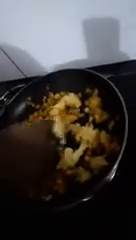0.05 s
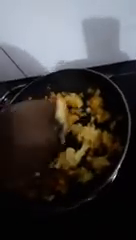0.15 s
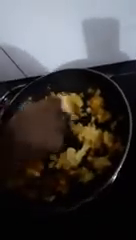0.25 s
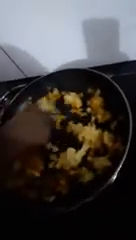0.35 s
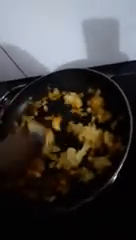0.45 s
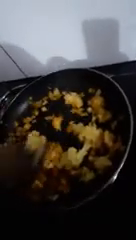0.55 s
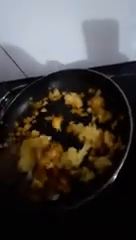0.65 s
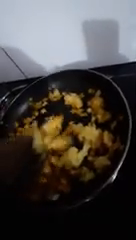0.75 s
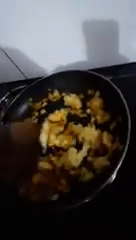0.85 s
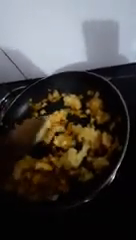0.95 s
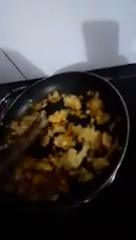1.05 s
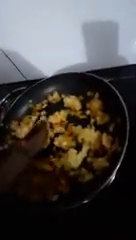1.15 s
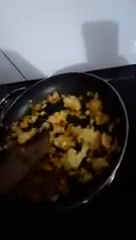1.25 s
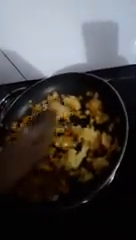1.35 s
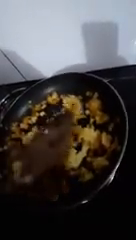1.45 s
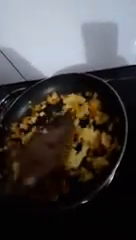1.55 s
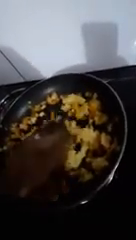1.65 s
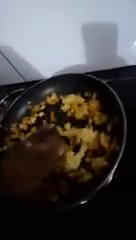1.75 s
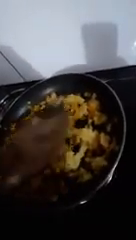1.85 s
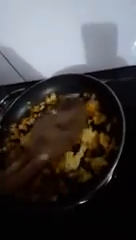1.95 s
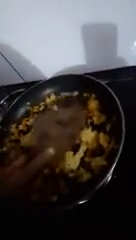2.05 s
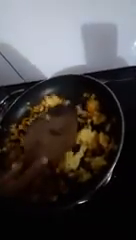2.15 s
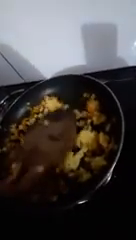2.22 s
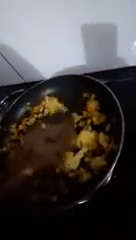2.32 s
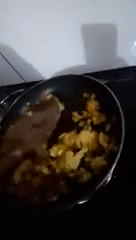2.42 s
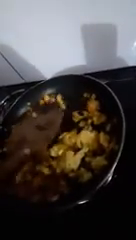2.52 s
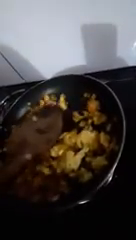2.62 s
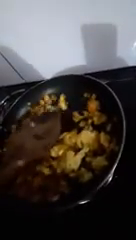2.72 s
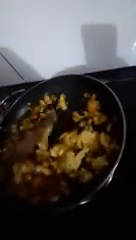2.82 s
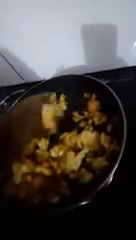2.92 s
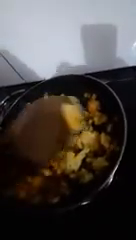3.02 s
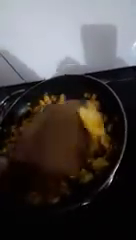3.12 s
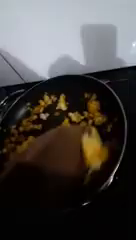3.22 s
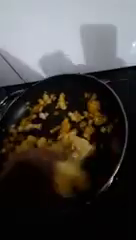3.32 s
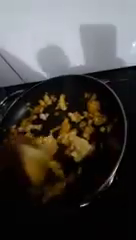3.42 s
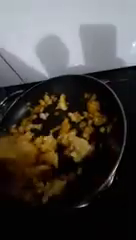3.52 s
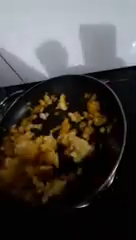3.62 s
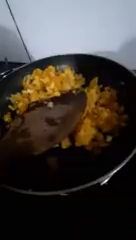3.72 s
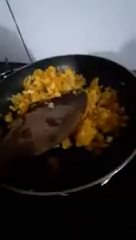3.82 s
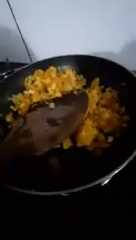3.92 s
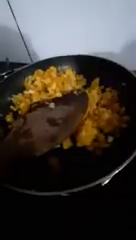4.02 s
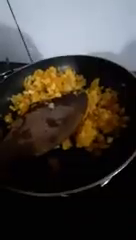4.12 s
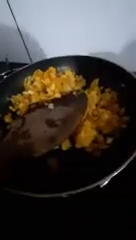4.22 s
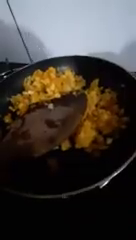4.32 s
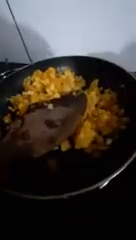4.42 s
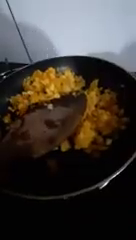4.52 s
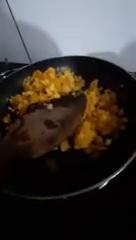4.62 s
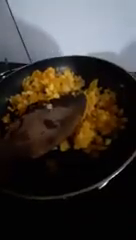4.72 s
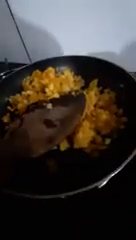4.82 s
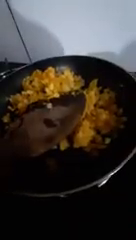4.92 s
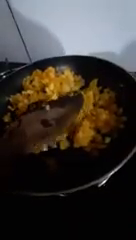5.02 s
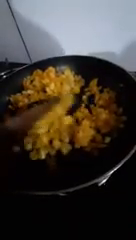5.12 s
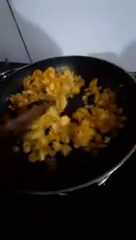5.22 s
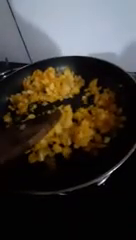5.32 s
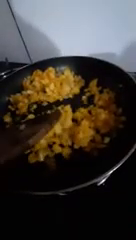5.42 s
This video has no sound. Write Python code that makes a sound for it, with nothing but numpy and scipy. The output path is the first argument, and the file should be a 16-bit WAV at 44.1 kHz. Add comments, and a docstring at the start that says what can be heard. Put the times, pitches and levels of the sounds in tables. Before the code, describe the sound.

A frying pan is heard close up in a small, slightly echoing kitchen, over very faint low room hum. At 0 s a wooden spatula chatters against the pan in a quick run of knocks with a dry, gritty scrape, ending by 0.2 s. A thin, bright, airy sizzle continues while pushes come about every third of a second, each a soft swell of moist crackle and rubbing on metal. A firm knock with a short scrape lands near 0.75 s, a lighter, brighter click at 1.9 s. Tiny fat spits tick throughout, the sharpest around 2.6 s, and the pan bumps dully on the stove. Strokes are softer from 2.1 to 2.9 s, then knocks cluster at 3.3-3.7 s, followed by a strong scraping push around 3.8 s. At 4 s the sizzle drops abruptly, then slowly creeps up under faint strokes. A last double knock, thud and scrape come at 5.2 s, before the end near 5.5 s.

```python
"""A wooden spatula stirs mashed potato and onion in a frying pan for 5.5 s, over a sizzle and a faint room hum.
0-0.2 s: a run of knocks and a dry scrape (struck pan modes; stick-slip grains rung through the pan).
0.2-4 s: pushes smear the wet food (coloured grains) and rub the metal; fat spits (noise bursts), the pan
bumps on the stove (short low pulses), and knocks fall near 0.7, 1.9 and 3.3-3.7 s, echoed by the kitchen.
4 s: a cut to a quieter sizzle, which then creeps up; weaker pushes, and last knocks and a scrape at 5.2 s."""
import sys
import numpy as np
from scipy import signal
from scipy.fft import rfft, irfft, next_fast_len
from scipy.io import wavfile
from scipy.ndimage import map_coordinates

SR = 44100
rng = np.random.default_rng(int(sys.argv[2]) if len(sys.argv) > 2 else 0)


def digitize_waveform(pressure):
    """Quantize a signal to 16-bit integers and store it at the path in sys.argv[1].

    Rows of a 2-D input are taken as channels; values are limited to [-1, 1].
    """
    field = np.atleast_2d(pressure).T
    bounded = np.clip(field, -1, 1)
    quanta = np.round(bounded * 32767).astype(np.int16)
    wavfile.write(sys.argv[1], SR, quanta)


N = 240628


def amp(db):
    """Decibels to gain."""
    return 10 ** (np.asarray(db) / 20)


def unit(x):
    """Scale to rms 1."""
    return x / np.sqrt(np.mean(x ** 2) + 1e-20)


def along(points, hz):
    """Read (f/Hz, value) points on a log-frequency axis."""
    f, v = np.transpose(points)
    return np.interp(np.log(hz + 1), np.log(f + 1), v)


def wobble(knots_per_s):
    """Smooth random curve through normally distributed knots."""
    knots = rng.standard_normal(int(N * knots_per_s / SR) + 4)
    return map_coordinates(knots, [np.arange(N) * knots_per_s / SR])


def filtered(x, response):
    """Multiply the spectrum of x by a response of frequency."""
    m = next_fast_len(x.shape[-1] + 8192)
    hz = np.fft.rfftfreq(m, 1 / SR)
    return irfft(rfft(x, m) * response(hz), m)[..., :x.shape[-1]]


def coloured(x, spectrum):
    """Minimum-phase filter with the gain of (f/Hz, level/dB) points."""
    def response(hz):
        cepstrum = irfft(np.log(amp(along(spectrum, hz))))
        half = len(cepstrum) // 2
        # fold onto positive time: causal
        return np.exp(rfft(np.r_[cepstrum[0], 2 * cepstrum[1:half], np.zeros(half)]))
    return filtered(x, response)


# left-right correlation: (f/Hz, likeness 0-1)
STEREO_LIKENESS = [(130, 0.95), (300, 0.43), (700, 0.36), (1400, 0), (3000, 0), (15000, 0.26)]


def spread(pair):
    """Mix two unrelated signals to left and right with the tabled correlation, highest in the bass."""
    def mid_side(hz):
        angle = np.arccos(np.clip(along(STEREO_LIKENESS, hz), -1, 1)) / 2
        return np.array([np.cos(angle), np.sin(angle)])
    mid, side = filtered(pair, mid_side)
    return np.array([mid + side, mid - side])


def lean(left_over_right_db):
    """Left and right gains for a level difference."""
    return unit(amp([[left_over_right_db / 2], [-left_over_right_db / 2]]))


def add(track, start_s, sound):
    """Mix a sound into a track."""
    start = max(round(start_s * SR), 0)
    part = sound[..., :N - start]
    track[..., start:start + part.shape[-1]] += part


def grains(rate_hz, scatter_db, life_s):
    """Decaying noise bursts at random moments, a few much larger than the rest; stereo, rms 1."""
    count = int(rate_hz * N / SR)
    sizes = amp(scatter_db * np.minimum(rng.exponential(size=count), 5))
    power = np.bincount(rng.integers(0, N, count), sizes ** 2, N)
    power = signal.lfilter([1], [1, -np.exp(-2 / (life_s * SR))], power)
    return unit(np.sqrt(power) * rng.standard_normal((2, N)))


# resting sizzle level, with a cut at 4 s: (t/s, level/dB)
SIZZLE_LEVEL = [(0, -42.5), (3.98, -43.5), (4.0, -52.5), (5.46, -48)]
# blade pushing food: (full pressure t/s, swell/s, release/s, crackle level/dB, rub level/dB, sizzle flare level/dB)
PUSHES = [(.01, .02, 0.095, -48.5, -43, -57), (.43, 0.066, .1, -45, -52.5, -60),
          (.74, 0.051, 0.095, -37, -48, -43), (1.07, 0.075, 0.1, -42.5, -52.5, -46),
          (1.26, 0.074, 0.073, -42, -44.5, -39.5), (1.581, 0.089, 0.13, -36.5, -47, -39.5),
          (1.78, 0.089, 0.074, -41.5, -44.5, -52), (2.15, 0.16, 0.23, -44, -55.5, -66),
          (2.47, 0.091, 0.2, -46, -58.5, -50), (2.78, 0.041, 0.097, -47, -56.5, -45),
          (3.225, 0.0097, 0.043, -38, -66, -50), (3.3, 0.07, 0.12, -36, -68, -40),
          (3.76, 0.16, 0.08, -35.5, -48, -37), (4.48, 0.033, 0.029, -54.5, -57, -59),
          (4.66, 0.1, 0.067, -59, -64, -50), (5.015, 0.032, 0.035, -46.5, -56, -43.5),
          (5.19, 0.12, 0.034, -44, -62.5, -45)]


def stirring():
    """Crackle, rub and sizzle levels in dB: each push adds a power swell to the resting levels."""
    t = np.arange(N) / SR
    level_s, level_points_db = np.transpose(SIZZLE_LEVEL)
    resting_db = np.interp(t, level_s, level_points_db)
    resting_crackle_db, resting_rub_db = -3.5, -17  # re sizzle
    power = amp([resting_db + resting_crackle_db, resting_db + resting_rub_db, resting_db]) ** 2
    for peak_s, swell_s, release_s, *levels_db in PUSHES:
        pressure = np.exp(-((t - peak_s) / np.where(t < peak_s, swell_s, release_s)) ** 2)
        power = power + np.outer(amp(levels_db), pressure) ** 2
    return 10 * np.log10(power)


# hard dry scrapes on bare metal: (peak t/s, attack/s, relative level/dB)
SCRAPES = [(.003, 0.0091, -28.5), (.765, 0.018, -36), (3.347, 0.013, -39), (3.465, 0.028, -42),
           (3.78, 0.04, -36), (5.211, 0.017, -35)]


def scraping():
    """Gain of the hard scrapes: the edge bites, lifts off quickly and slides on lightly."""
    release_s, slide_db, slide_release_s = 0.014, -11.5, 0.13
    gain = np.zeros(N)
    for peak_s, attack_s, db in SCRAPES:
        t = np.arange(N) / SR - peak_s
        bite = np.exp(-(np.minimum(t, 0) / attack_s) ** 2)
        after = np.maximum(t, 0)
        lift_off = np.exp(-after / release_s)
        slide = amp(slide_db) * np.exp(-after / slide_release_s)
        gain += amp(db) * bite * (lift_off + slide)
    return gain


# pan with blade against it: (f/Hz, mean relative level/dB, undamped t60/s); short modes: wood and loaded base
PAN_MODES = [(291.3, -14.5, 0.085), (650.5, -8, 0.17), (710, 14.5, 0.011), (866, -34, 0.38),
             (921.5, -23.5, 0.54), (1144, -16.5, 0.11), (1221, -12, 0.11), (1386, 8.5, 0.0098),
             (1525, -6, 0.067), (1575, -32.5, 0.15), (1744, -21, 0.2), (2046, -7.5, 0.05),
             (2070, -4, 0.011), (2430, -25, 0.15), (3025, -28, 0.16), (3406, -14, 0.034),
             (4560, 0.5, 0.0051), (5750, -29, 0.44), (6370, -10, 0.025)]


def pan_ring(damping_db_per_s):
    """Pan's answer to one push: decaying modes, each with its own strength and phase per side."""
    t = np.arange(SR // 2) / SR
    ring = np.zeros((2, len(t)))
    for k, (hz, db, t60_s) in enumerate(PAN_MODES):
        size_db, phase = rng.standard_normal((2, 2, 1))
        lag = .6 * phase * np.sqrt(hz / PAN_MODES[2][0])
        decay = amp(db + size_db - 60 * t / t60_s - damping_db_per_s * t)
        ring += (-1) ** k * decay * np.sin(2 * np.pi * hz * t + lag)
    return ring * (1 - np.exp(-t / 0.00045))


# dry rasp spectrum: (f/Hz, relative level/dB)
RASP_SPECTRUM = [(100, -30), (300, -0.5), (720, -6), (1050, -1), (1480, -3.5), (2100, 2), (2900, -7),
                 (5000, -17.5), (9000, -32)]
# resonances of the blade gliding on the greased pan: (f/Hz, width/Hz, relative level/dB)
GLIDE_MODES = [(749, 137, -5), (1297, 38, 1), (1498, 81, 2), (2343, 47, -5), (3036, 210, -2.5)]


def rubbing(rub_db):
    """Stick-slip grains drive glide resonances, the damped pan and a rasp that grows faster than the level."""
    glide_tone_db, glide_grit_db = -6.5, -2  # re rub level
    level_db = 20 * np.log10(np.hypot(amp(rub_db + glide_grit_db), scraping()))
    slips = spread(grains(rate_hz=2500, scatter_db=2.3, life_s=.0006))
    held_pan = pan_ring(damping_db_per_s=300)  # blade pressed on the pan
    ring = signal.fftconvolve(slips, held_pan, axes=1)[:, :N]
    ring = unit(coloured(ring, [(250, -7.5), (750, -14.5), (1100, -3), (1500, -4.5), (2000, -1), (3000, 6.0)]))
    rasp = unit(coloured(slips, RASP_SPECTRUM)) * amp(0.12 * (level_db + 38.0))

    def resonances(f):
        total = 0
        for k, (hz, width_hz, db) in enumerate(GLIDE_MODES):
            damping = 1j * f * width_hz
            total = total + (-1) ** k * amp(db) * damping / (hz * hz - f * f + damping)
        return total

    glide = unit(filtered(slips, resonances)) * amp(rub_db + glide_tone_db)
    grit = (0.79 * ring + 0.76 * rasp) * amp(level_db)
    unsteady_db = 1.5 * wobble(30)
    return (grit + glide) * amp(unsteady_db) * lean(-6.0)


# blade on pan: (t/s, relative level/dB, weight = bass setting/dB, hardness = treble setting/dB)
KNOCKS = [(.001, -21.5, 11, 0), (.0102, -17.5, -4, 1), (.0265, -18.5, 3, -4), (.04, -19.5, -12, -14),
          (.057, -22, 2, -18), (.165, -27.5, -9, -12), (.7385, -8, 1.5, -1.5), (.7995, -33, 5, 2),
          (1.8972, -19, -2, 19.5), (3.343, -23.5, 2.5, -34), (3.4324, -6.5, -6, 8), (3.4342, -14, 8.5, -5),
          (3.66, -10, 4.5, 11.5), (3.722, -21.5, 1, -25), (5.2072, -19, 15, 19), (5.2123, -14.5, 10, -3)]


def knocks():
    """Contact push and chatter plus pan ring: weight lifts the bass, hardness the treble."""
    track, t = np.zeros((2, N)), np.arange(SR // 2) / SR
    for s, db, weight_db, hardness_db in KNOCKS:
        push = 4 * np.exp(-t / .00008)
        chatter = 1.46 * amp(-60 * t / 0.016) * spread(rng.standard_normal((2, len(t))))
        contact = [(40, -16), (150, weight_db - 9.0), (280, weight_db), (440, .5 * weight_db - 11),
                   (700, -2.0), (1400, 0.46 * hardness_db - 0.5), (2900, hardness_db + 1.5),
                   (7000, 2.47 * hardness_db - 15.5), (9500, 2.4 * hardness_db - 34.5)]
        blow = coloured(pan_ring(damping_db_per_s=0) + push + chatter, contact)
        onset_rms = np.sqrt(np.mean(blow[:, t < .004] ** 2))
        add(track, s, amp(db - 8.5) * blow / onset_rms)
    return track * lean(0.31)


# sizzle spectrum: (f/Hz, relative density level/dB)
SIZZLE_SPECTRUM = [(500, -28.5), (1500, -19.5), (2800, -17), (3900, -16), (4900, -18), (6400, -1),
                   (7700, -2.5), (8600, -14.5), (9800, -9), (11700, -1), (13300, -3), (15800, -10)]
# wet smear spectrum: (f/Hz, relative density level/dB)
SMEAR_SPECTRUM = [(600, -22), (2000, -8.5), (3300, 0), (5000, 0), (6500, 4), (7700, -1), (8700, -14.5),
                  (12000, -16.5), (16000, 1)]


def sizzle(sizzle_db, smear_db):
    """Steam bubbles burst in the fat as dense fine grains; pressed food crackles in sparser, longer ones."""
    bubbles = grains(rate_hz=9000, scatter_db=2.1, life_s=.0005)
    pops = grains(rate_hz=240, scatter_db=4.2, life_s=.001)
    crackle = grains(rate_hz=3000, scatter_db=2.7, life_s=.0006)
    flare_db = .9 * wobble(26)
    fizz = unit(coloured(unit(bubbles + 0.39 * pops), SIZZLE_SPECTRUM))
    fizz = fizz * amp(sizzle_db + flare_db) * lean(6.6)
    smear = unit(coloured(crackle, SMEAR_SPECTRUM)) * amp(smear_db + 1.4 * wobble(30))
    return fizz + smear


# loudest spits of fat: (t/s, relative level/dB, top-treble tilt setting/dB)
SPITS = [(.1502, -29, 25), (0.3934, -30, 8), (0.42, -37, -15), (0.5495, -28, 11), (.695, -31.5, 5),
         (0.7591, -27.5, 14), (1.0333, -24.5, 15), (1.066, -31, -13), (1.2107, -30, 13),
         (1.4778, -31.5, -25), (1.5074, -28.5, -3), (1.7285, -29, 13), (2.014, -26.5, 28),
         (2.5819, -18.5, 8.5), (3.22, -26, 14.5), (3.715, -26.5, 19), (3.8383, -24.5, 25), (3.888, -25, 24)]
# spit spectrum before tilt: (f/Hz, relative density level/dB)
SPIT_SPECTRUM = [(500, -29), (2000, -1.5), (4000, -3), (6500, 17), (7700, 11.5), (8700, 2), (11500, 9.5),
                 (16000, -1)]


def spits(life_s):
    """A drop of water bursts in the fat: a few ms of coloured noise, its top treble tilted per drop."""
    track, t = np.zeros((2, N)), np.arange(SR // 40) / SR
    for s, db, tilt_db in SPITS:
        spray = rng.standard_normal((2, len(t))) * (t / life_s) * np.exp(-t / life_s)
        spray = coloured(spray, SPIT_SPECTRUM)
        spray = coloured(spray, [(7500, 0), (11000, 0.71 * tilt_db), (13500, tilt_db)])
        onset_rms = np.sqrt(np.mean(spray[:, t < .002] ** 2))
        add(track, s - 1.5 * life_s, amp(db) * spray / onset_rms)
    return track * lean(8)


# soft bumps of pan on stove: (t/s, peak level before colouring/dB)
BUMPS = [(0.101, -37.5), (0.964, -39), (1.24, -39), (1.798, -39.5), (2.086, -40.5), (2.299, -39),
         (2.591, -39.5), (2.863, -39.5), (3.09, -39), (3.368, -34.5), (3.811, -32.5), (4.705, -39.5),
         (4.832, -43), (4.97, -40.5), (5.186, -32.5), (5.333, -38)]


def bumps(pitch_hz, life_s):
    """The pan rocks on its support: one dull push of a cycle or two, its pitch scattered per bump."""
    track, t = np.zeros(N), np.arange(SR // 8) / SR
    for s, db in BUMPS:
        hz = pitch_hz * np.exp(0.1 * rng.standard_normal())
        swell = (t / life_s) ** 2 * np.exp(2 - 2 * t / life_s)
        push = swell * np.cos(2 * np.pi * hz * (t - life_s) + 0.33)
        add(track, s - life_s, amp(db) * push)
    colour = [(25, -10), (55, 9.0), (105, -3), (160, 1.5), (250, -2.5), (1500, -6), (4000, 2)]
    return coloured(track, colour) * lean(-2.3)


# kitchen echo: (f/Hz, t60/s)
ROOM_DECAY = [(60, 0.083), (140, 0.43), (700, 0.28), (2000, 0.35), (6000, 0.092), (14000, 0.19)]


def echo(x, delay_s):
    """Walls answer after a delay: convolution with noise that decays at its own rate per frequency."""
    noise = spread(rng.standard_normal((2, SR // 2)))
    hz, t, z = signal.stft(noise, SR, nperseg=256)
    decay = amp(-60 * t / along(ROOM_DECAY, hz)[:, None])
    tail = signal.istft(z * decay, SR, nperseg=256)[1]
    tail = np.pad(tail / np.linalg.norm(tail[0]), ((0, 0), (round(delay_s * SR), 0)))
    return signal.fftconvolve(x, tail, axes=1)[:, :N]


# room noise spectrum: (f/Hz, relative density level/dB)
AIR_SPECTRUM = [(20, -40), (35, -15), (60, -3), (130, -2), (200, -10.5), (270, -7.5), (460, -4), (600, -14),
                (900, -24.5), (3000, -18)]
# hum partials: (f/Hz, mean rms level/dB)
HUM_PARTIALS = [(146, -71.5), (198, -71.5), (443, -67), (491, -104)]


def kitchen():
    """Low coloured noise, plus hum partials wavering in level and phase."""
    t = np.arange(N) / SR
    air_db = -56.5 + 1.5 * wobble(6)
    air = unit(coloured(spread(rng.standard_normal((2, N))), AIR_SPECTRUM)) * amp(air_db)
    hum = np.zeros(N)
    for hz, db in HUM_PARTIALS:
        level = np.sqrt(2) * amp(db + wobble(21))
        hum += level * np.sin(2 * np.pi * hz * t + 1.1 * wobble(10))
    return air + hum


def scene():
    """Pan and food close by, the kitchen around them."""
    smear_db, rub_db, sizzle_db = stirring()
    blows = knocks()
    thuds = bumps(pitch_hz=131, life_s=0.0053)
    drops = spits(life_s=0.00092)
    walls = echo(amp(-6.0) * blows + amp(-5.5) * thuds + amp(-15) * drops, delay_s=.004)
    right_lead_s = .00008  # pan reaches the right side first
    sides = np.array([[-1], [1]])
    pan = filtered(blows + rubbing(rub_db), lambda hz: np.exp(1j * np.pi * hz * right_lead_s * sides))
    return sizzle(sizzle_db, smear_db) + pan + thuds + drops + walls + kitchen()


def record(dry):
    """Remove everything from the band limit up."""
    top_hz = 16050
    return filtered(dry, lambda hz: hz < top_hz)


dry = scene()
out = record(dry)
digitize_waveform(out)
```